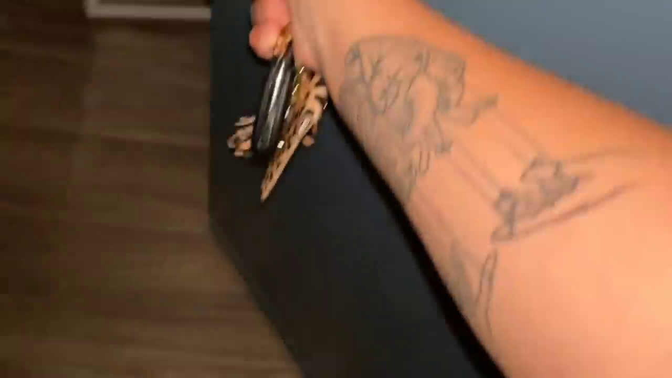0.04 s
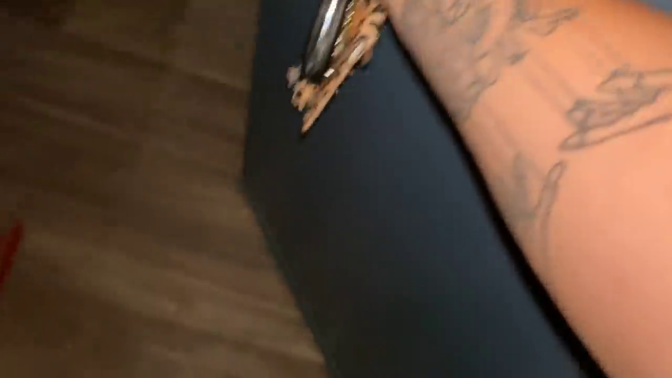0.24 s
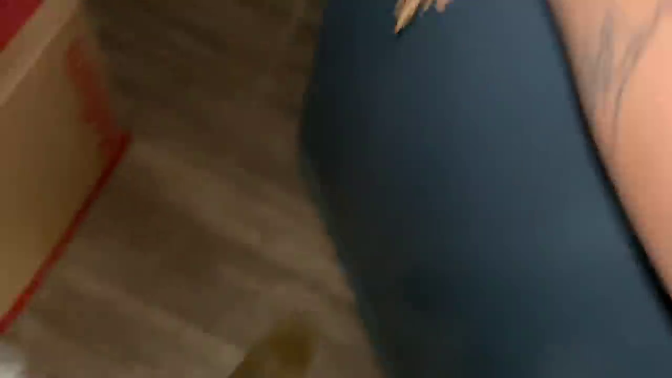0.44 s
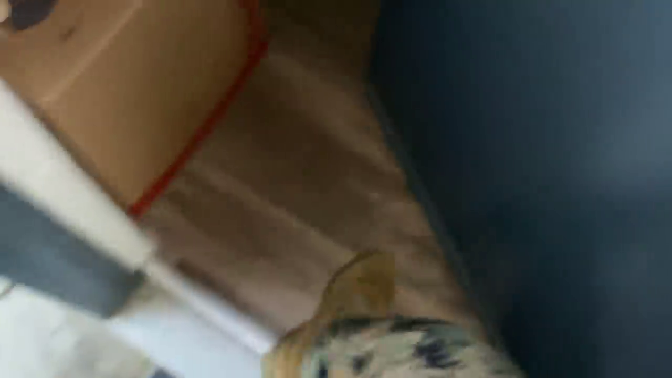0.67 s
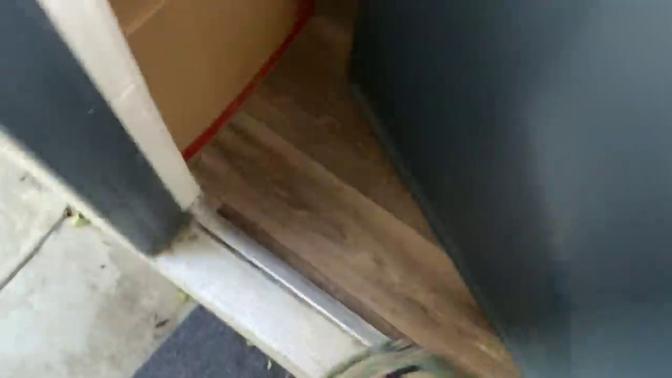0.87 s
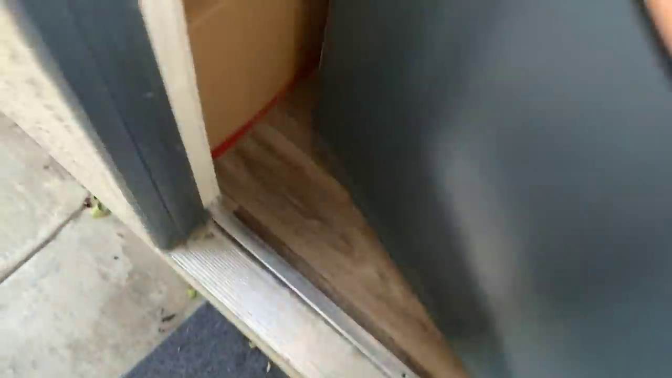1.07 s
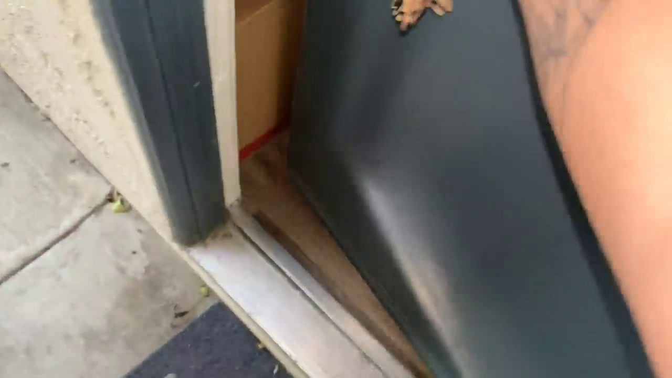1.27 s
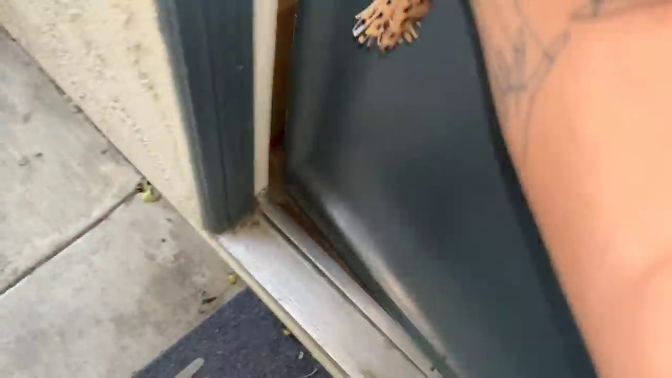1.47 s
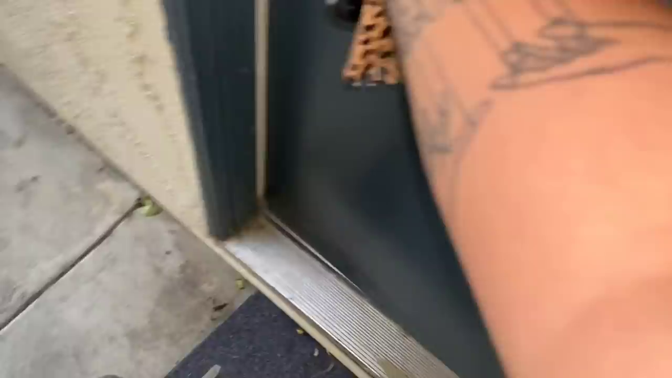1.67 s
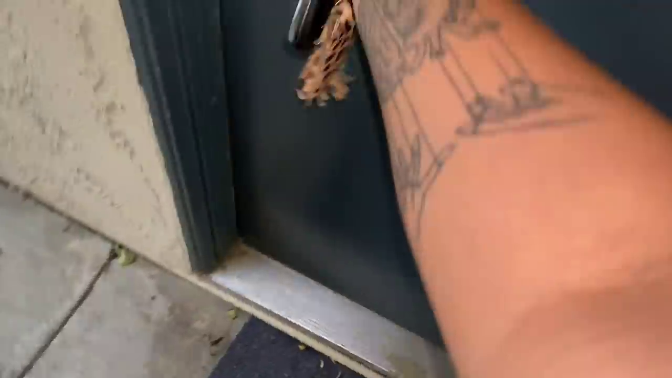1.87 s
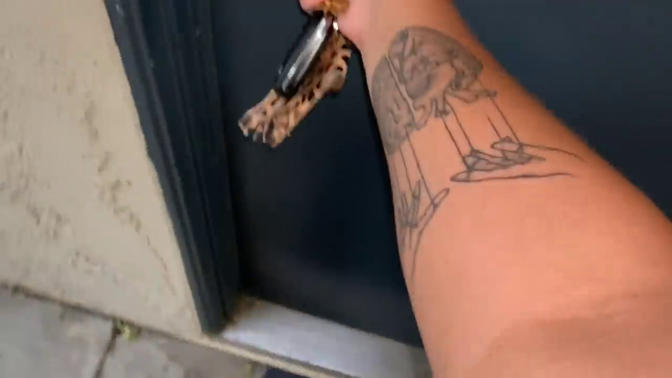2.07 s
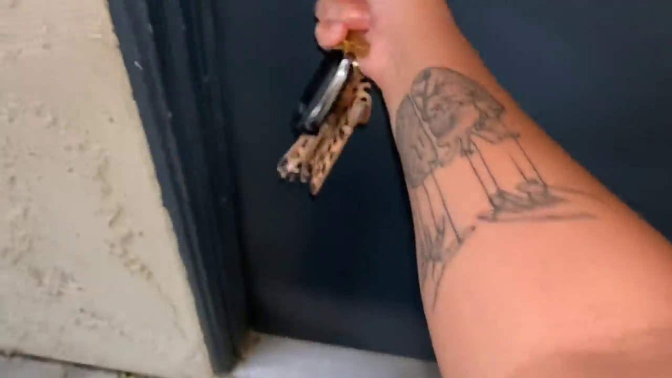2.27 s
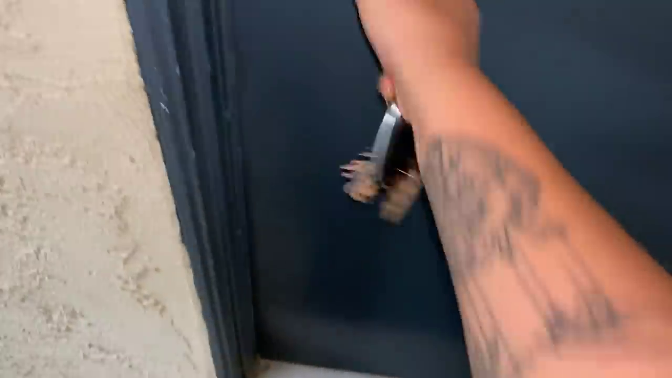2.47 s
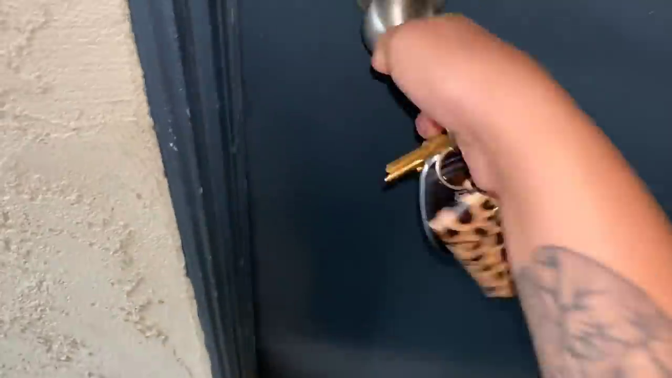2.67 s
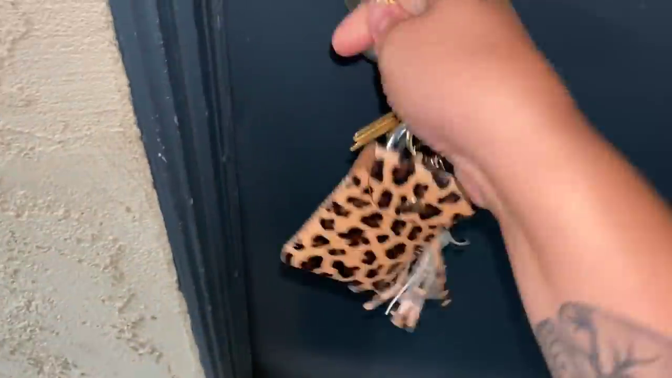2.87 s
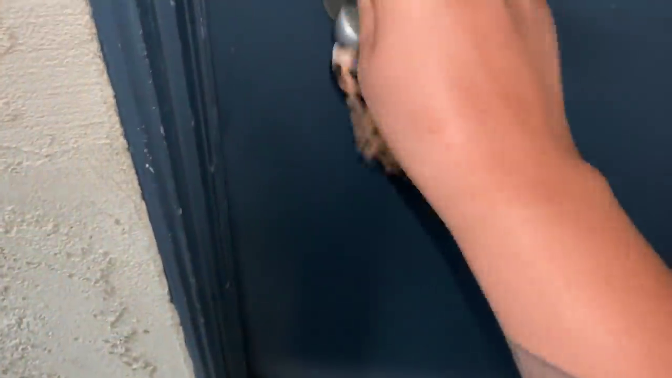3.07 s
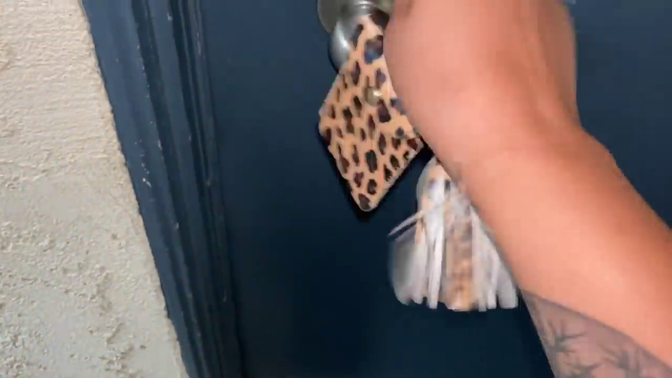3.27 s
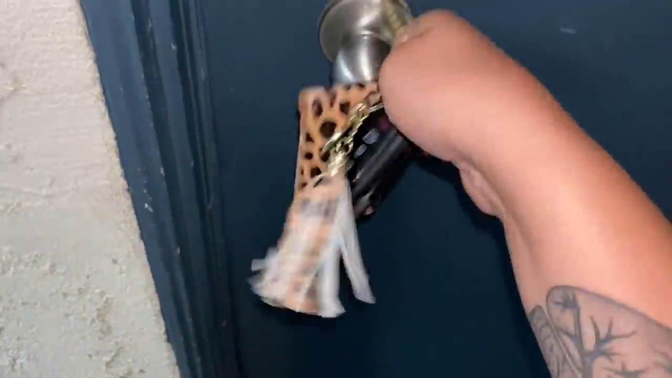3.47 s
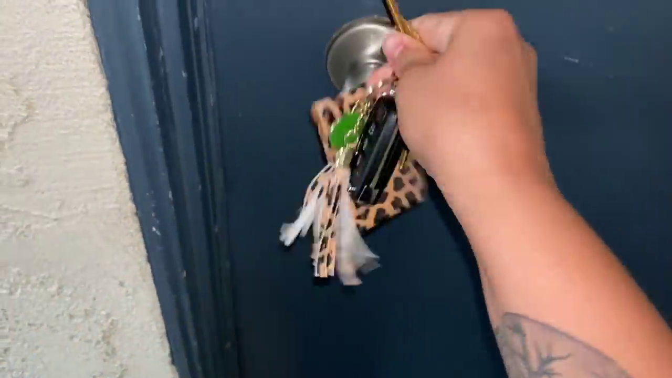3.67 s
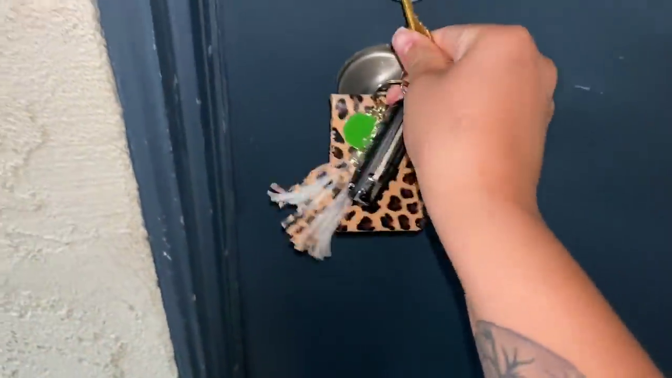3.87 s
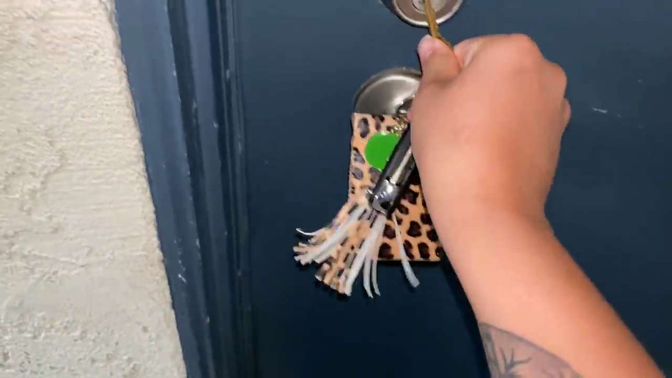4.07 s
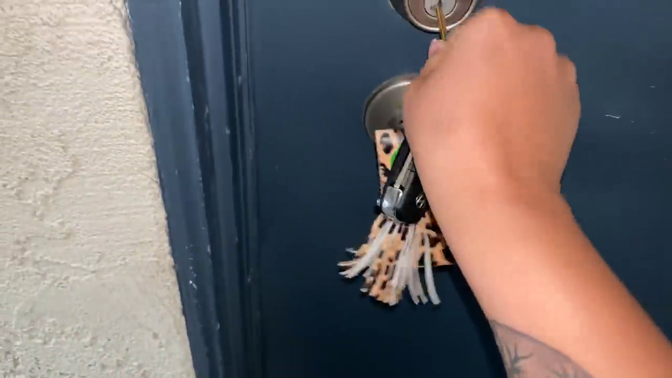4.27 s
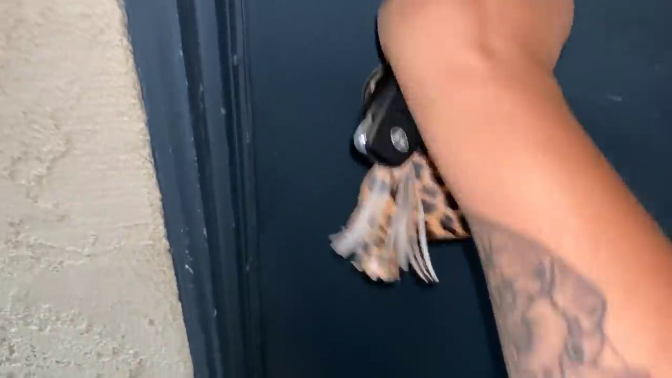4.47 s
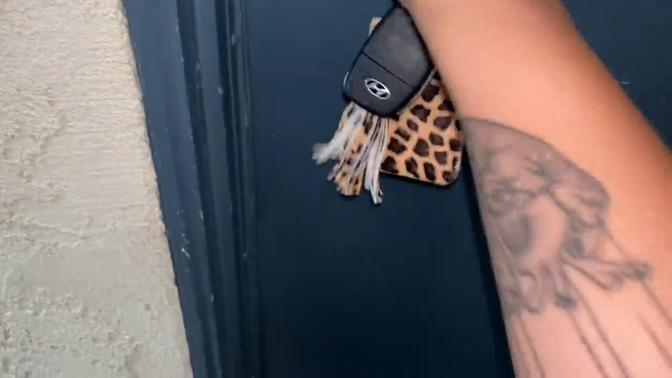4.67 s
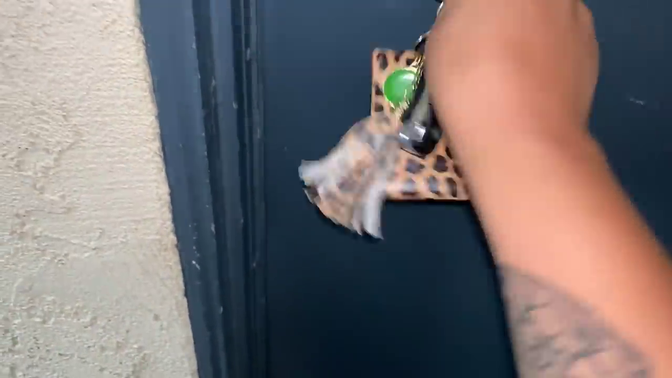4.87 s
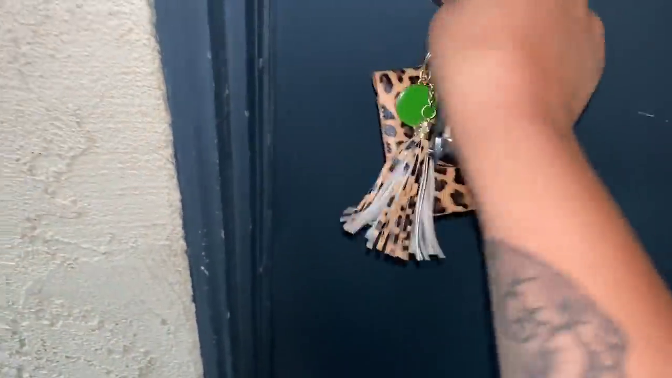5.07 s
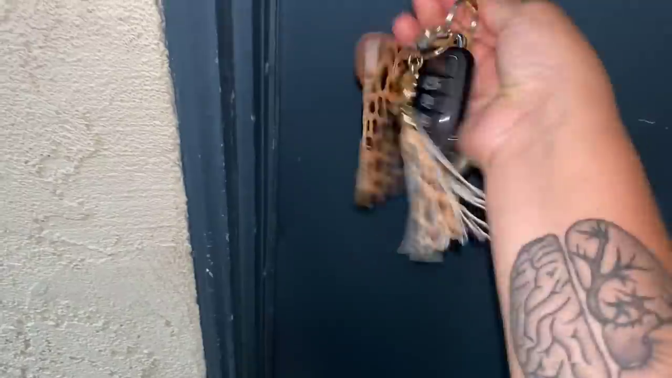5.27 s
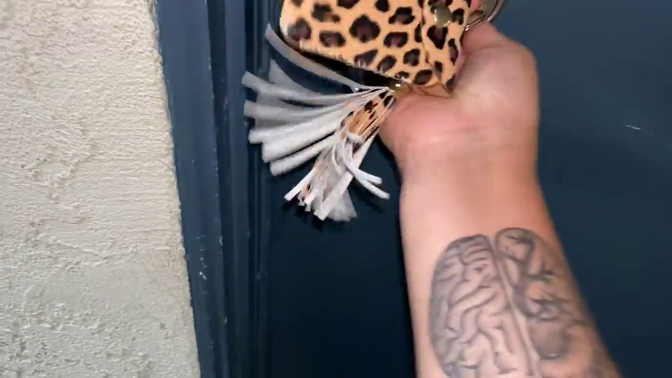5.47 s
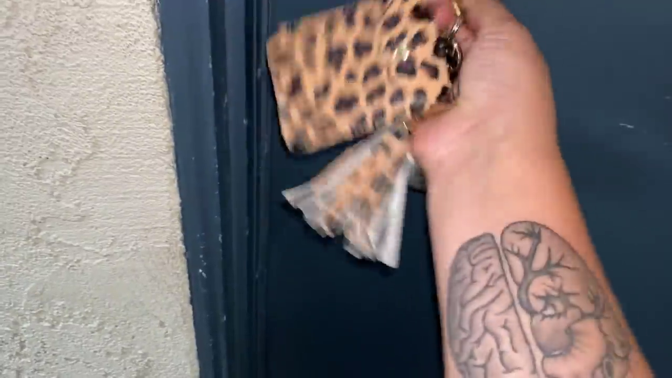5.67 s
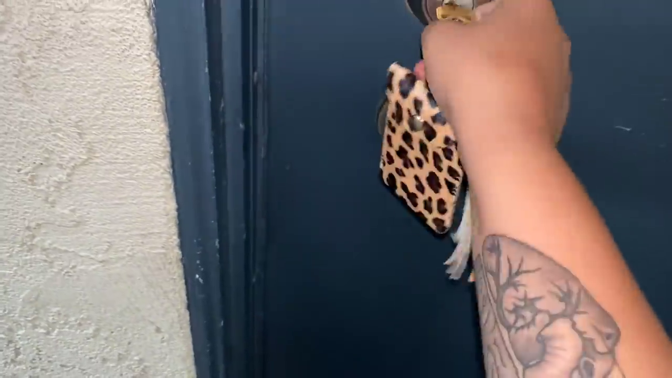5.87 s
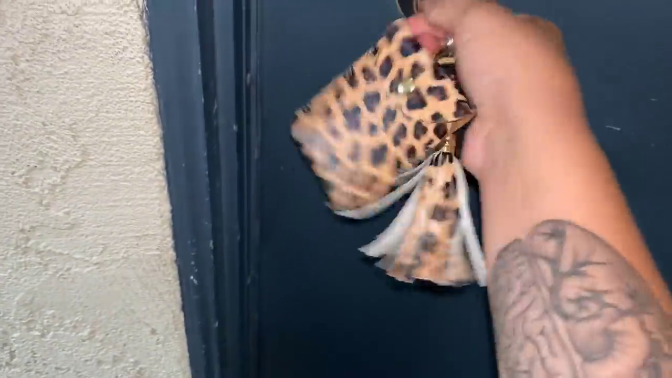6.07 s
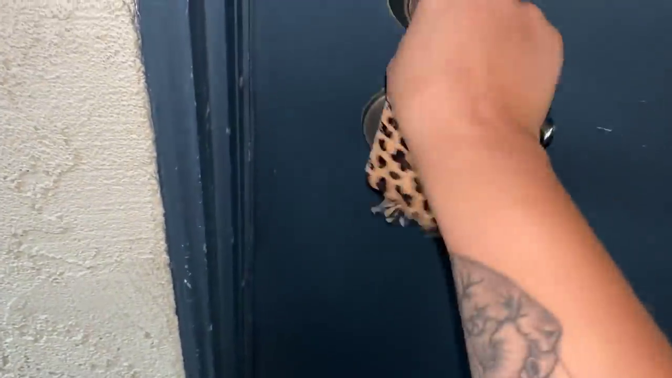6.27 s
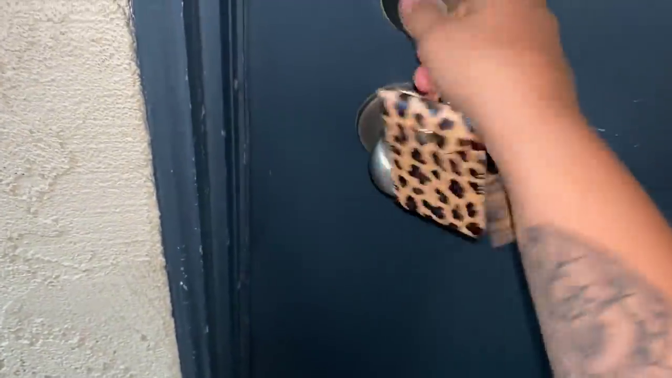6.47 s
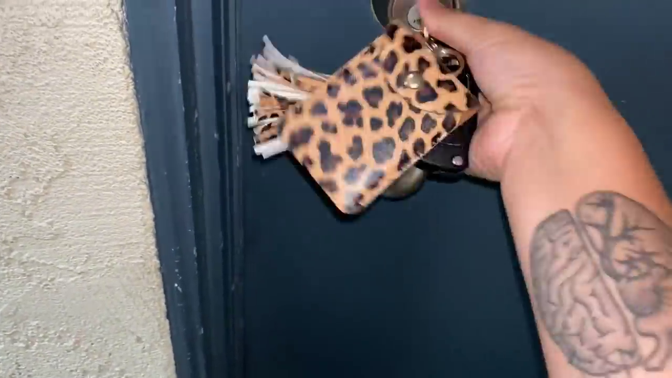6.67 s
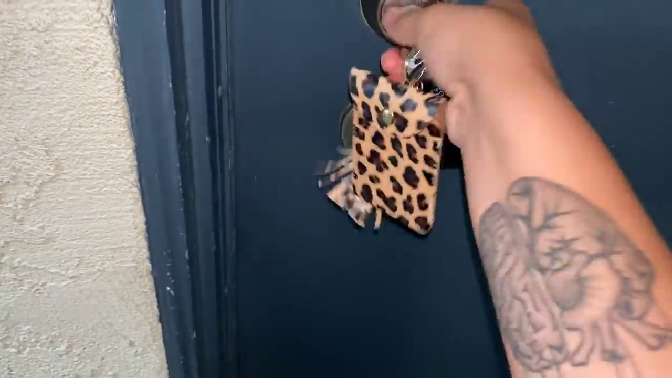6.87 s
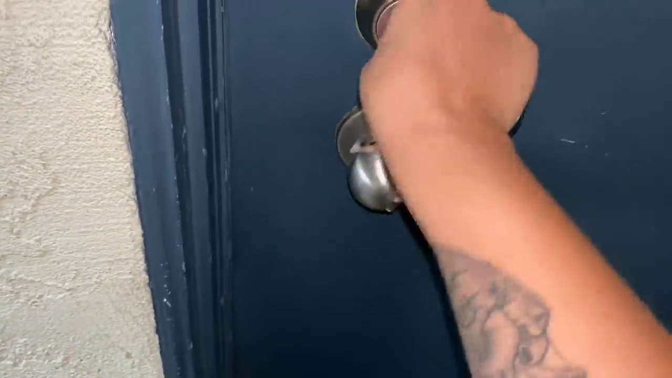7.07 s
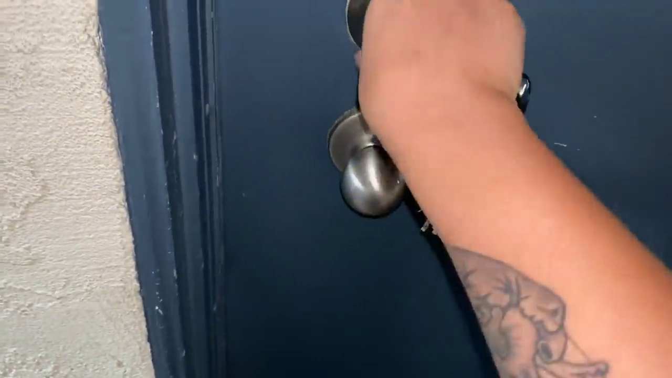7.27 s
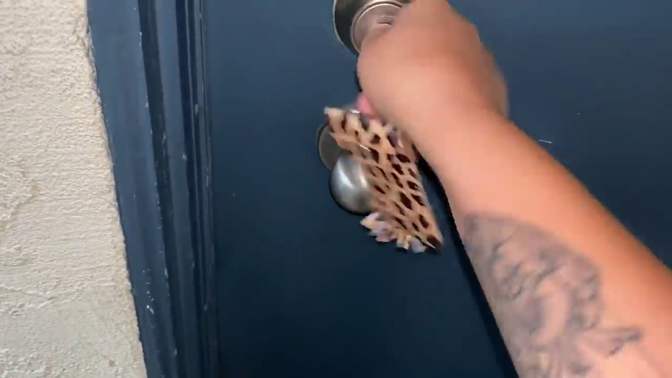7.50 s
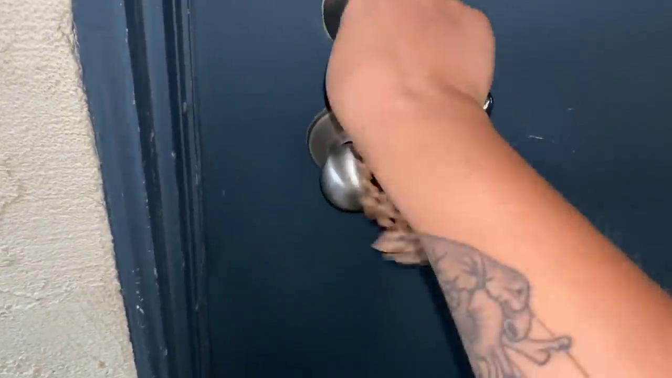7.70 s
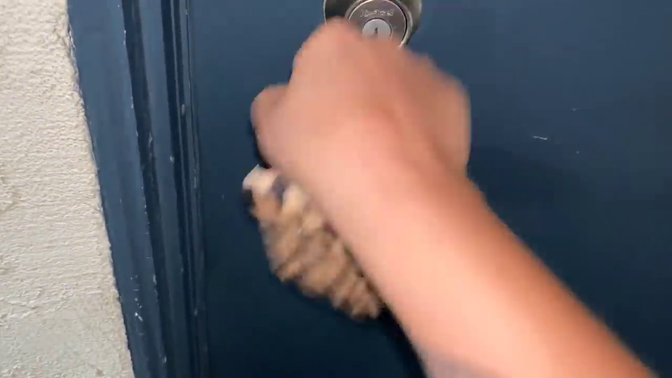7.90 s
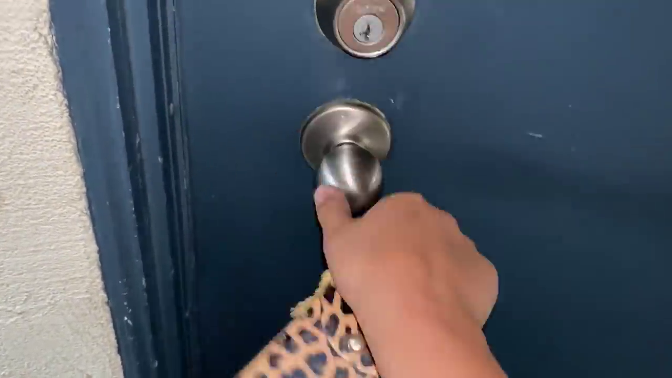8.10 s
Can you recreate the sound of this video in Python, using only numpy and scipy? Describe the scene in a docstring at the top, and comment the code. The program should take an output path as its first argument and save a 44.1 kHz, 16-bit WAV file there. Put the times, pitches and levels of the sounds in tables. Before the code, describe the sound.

In a small walled porch, a door swings with faint scuffs and small ticks, its seal chirps, and it shuts with a dull double thump and a hard latch clack. Keys then clink brightly, jingle in bursts and scrape at the lock, until a sharp bolt knock rings through the door leaf. Low distant traffic rumbles underneath. Close handheld stereo microphone.

```python
"""In a walled porch a front door is pulled shut, then a hand works a bunch of keys into the lock and turns the bolt.
Keys clink from short grazing clicks that excite damped ringing modes, and jingle when they hang free.
Latch, knob and bolt knock through the modes of the door leaf, soft pushes thump it, and the seal chirps downwards.
Shaped grains make rubbing, swish and key chatter; swelling filtered noise makes the far traffic rumble below.
A hand-held pair of microphone ports hears it all with a phase twist between the sides."""
import sys
import numpy as np
from scipy import signal
from scipy.fft import rfft, irfft, next_fast_len
from scipy.io import wavfile
from scipy.ndimage import uniform_filter1d

SR = 44100
rng = np.random.default_rng(int(sys.argv[2]) if len(sys.argv) > 2 else 0)


def file_out(sig):
    """Save sig as 16-bit WAV at sys.argv[1]."""
    # one column per channel
    cols = np.atleast_2d(sig).T
    # limit, then scale
    lim = np.clip(cols, -1, 1)
    pcm = np.round(lim * 32767).astype(np.int16)
    wavfile.write(sys.argv[1], SR, pcm)


N = 358974
SIZE = next_fast_len(N + SR)  # FFT length, padded by at least a second
HZ = np.maximum(np.fft.rfftfreq(SIZE, 1 / SR), 1)
GRAZE_S = .003  # light touching before a contact lands


def amp(db):
    """dB to gain."""
    return 10 ** (np.asarray(db) / 20)


def rms_one(x):
    """Scale to rms 1."""
    return x / np.sqrt(np.mean(x ** 2) + 1e-20)


def peak_one(x):
    """Scale to peak 1."""
    return x / np.abs(x).max()


def over_hz(table):
    """Columns of a frequency table on the FFT grid, interpolated over log frequency."""
    hz, *columns = np.transpose(table)
    return [np.interp(np.log(HZ), np.log(hz), column) for column in columns]


def in_time(table):
    """Columns of a time table at every sample."""
    s, *columns = np.transpose(table)
    return [np.interp(np.arange(N) / SR, s, column) for column in columns]


def coloured(x, spectrum):
    """Give white input the spectrum; rms 1."""
    gain = amp(over_hz(spectrum)[0])
    return rms_one(irfft(rfft(x, SIZE) * gain, SIZE)[:N])


def grains(per_s, spread_db):
    """Random clicks of uneven size and either sign; rms 1."""
    sizes = amp(spread_db * np.minimum(rng.exponential(1, N), 4)) * rng.choice([-1, 1], N)
    return rms_one(sizes * (rng.random(N) < per_s / SR))


def ring(x, hz, t60):
    """A two-pole resonator: a unit click sets a decaying sine of height 1 ringing."""
    r, w = amp(-60 / (t60 * SR)), 2 * np.pi * hz / SR
    return signal.lfilter([0, np.sin(w)], [1, -2 * r * np.cos(w), r * r], x + 1e-18)


def chatter(length):
    """A contact grazes for a moment, lands with one click and dies in a rattle of smaller ones."""
    t = np.arange(SR // 4) / SR - GRAZE_S
    shape = np.where(t < 0, np.exp(t / GRAZE_S * 2), np.exp(-t / max(length, .0005)))
    sparse = rng.standard_normal(len(t)) ** 3 * (rng.random(len(t)) < .3)
    clicks = sparse * shape * 0.11 * min(1, length / 0.0044)
    clicks[round(GRAZE_S * SR)] = min(1, 0.003 / length)  # a long rattle has no dominant click
    return clicks


def struck(clicks, modes):
    """Every blow lands on another spot and so weighs the modes anew."""
    chance_db = rng.normal(0, 3.5, len(modes))
    return sum(amp(db + more_db) * ring(clicks, hz, t60)
               for (hz, db, t60), more_db in zip(modes, chance_db))


def crack(clicks, low_hz, high_hz):
    """The broad dry edge of a contact: its clicks through a band-pass; peak 1."""
    band = signal.butter(2, [low_hz, min(high_hz, .45 * SR)], "band", fs=SR, output="sos")
    return peak_one(signal.sosfilt(band, clicks))


def add(out, s, sound):
    """Mix a contact in so that its graze ends at the given time."""
    at = round((s - GRAZE_S) * SR)
    out[at:][:len(sound)] += sound[:N - at]


# Colour of the far traffic. Each row: frequency in Hz, relative level in dB.
TRAFFIC_COLOUR = [(25, -39), (53, 9), (80, 5), (157, -4), (326, -18), (900, -25.5), (2000, -45.5),
                  (4500, -35.5), (9000, -108), (16000, -43)]
# Traffic swelling and fading. Each row: time in seconds, level in dB.
TRAFFIC_SWELL = [(0, -54), (1.5, -49), (2.1, -43.5), (2.7, -50.5), (4.3, -48.5), (4.7, -48.5), (5.6, -50.5),
                 (8.14, -50.5)]


def traffic():
    """Far traffic: coloured noise that swells slowly, in two independent fields."""
    rumble = np.array([coloured(rng.standard_normal(N), TRAFFIC_COLOUR) for field in range(2)])
    return amp(in_time(TRAFFIC_SWELL)[0]) * rumble


# Colour of the rubbing. Each row: frequency in Hz, relative level in dB.
RUB_COLOUR = [(70, 18.5), (300, 5.5), (600, 5), (1300, 0.5), (2500, -7.5), (5000, -7.5), (10000, -69)]
# How strongly hand, seal and shoes rub. Each row: time in seconds, level in dB.
RUBBING = [(0, -52.5), (.3, -65), (.55, -56), (.8, -63), (1.2, -61), (1.58, -64.5), (1.85, -48.5),
           (2.2, -62), (2.55, -51), (2.85, -65.5), (3.3, -59), (3.65, -116), (4.02, -66.5), (4.38, -58),
           (4.58, -38.5), (4.7, -54), (5.95, -62), (6.1, -54), (6.58, -60), (6.85, -52), (7.7, -52.5),
           (7.85, -55.5), (8.14, -65)]


def rubbing():
    """Hand, seal and shoes rub: dense small clicks, coloured, make a grainy noise."""
    return amp(in_time(RUBBING)[0]) * coloured(grains(per_s=1200.0, spread_db=1.5), RUB_COLOUR)


# The arm or the bunch swings. Each row: start in seconds, hold in seconds,
# level of cloth and tassel swish in dB, level of small key chatter in dB.
SWINGS = [(0, 0.0052, -63, -65), (0.423, 0.28, -63.5, -65.5), (0.98, 0.15, -61, -93),
          (1.647, 0.027, -63.5, -79), (2.392, 0.36, -67.5, -60.5), (2.763, 0.11, -89, -82),
          (3.106, 0.13, -64, -50), (3.503, 0.062, -85, -55.5), (4.634, 0.097, -59, -49.5),
          (4.875, 0.36, -56.5, -56), (5.463, 0.23, -97, -67.5), (5.91, 0.03, -90, -74),
          (6.14, 0.011, -72, -56), (6.516, 0.017, -62.5, -58), (6.86, 0.043, -93, -64),
          (7.637, 0.012, -87, -60.5), (8.006, 0.18, -66, -56)]
SWING_RISE_DB_PER_S, SWING_FALL_DB_PER_S = 99, 59


def swings():
    """Each swing swells, holds and fades; returns swish and chatter levels in dB, swings added as power."""
    start, hold, *levels = np.transpose(SWINGS)[:, :, None]
    t = np.arange(0, N / SR + .01, .005)
    rise_db = -SWING_RISE_DB_PER_S * np.maximum(start - t, 0)
    fall_db = -SWING_FALL_DB_PER_S * np.maximum(t - start - hold, 0)
    powers = [np.sum(amp(db + rise_db + fall_db) ** 2, axis=0) for db in levels]
    return in_time(np.transpose([t] + [10 * np.log10(power) for power in powers]))


# Colour of cloth and tassel. Each row: frequency in Hz, relative level in dB.
SWISH_COLOUR = [(800, -8), (2000, -2.5), (5000, -3.5), (8000, -8), (12000, -12), (16000, -66)]


def swish(level_db):
    """Cloth and tassel brush past: very dense, fairly even grains make a smooth hiss."""
    return amp(level_db) * coloured(grains(per_s=3200.0, spread_db=0.5), SWISH_COLOUR)


def key_chatter(level_db):
    """Small uneven touches in the bunch, in clumps; each is a tick of a few cycles at one or two pitches."""
    drift = rms_one(uniform_filter1d(rng.standard_normal(N), size=500))
    touches = amp(5 * np.minimum(drift, 2)) * grains(per_s=1500.0, spread_db=3.5)
    pitches = np.geomspace(3200, 15000, 10)
    dealt = rng.integers(0, len(pitches), (2, N))  # two pitch draws per touch
    ticks = np.zeros(N)
    for k, hz in enumerate(pitches):
        chosen = touches * (dealt == k).any(axis=0)
        ticks += ring(chosen, hz, 18.0 / hz) * (hz / 6000) ** 0.3
    return amp(level_db) * rms_one(ticks)


# Modes of the door leaf. Each row: frequency in Hz, level in dB, 60 dB decay in seconds.
DOOR_MODES = [(59.2, -10.5, 0.9), (75.7, -3.5, 0.2), (116.7, -12, 1), (159, 2, 0.19), (197, -11, 0.11),
              (300, -25.5, 0.25), (417, -38, 0.25), (510, -0.5, 0.065), (720, -1.5, 0.073),
              (786, -24, 0.076), (1110, -42, 0.11), (1290, 15.5, 0.013), (1600, 1, 0.011)]
# Latch, knob, bolt and shoes. Each row: time in seconds, level in dB, colour in Hz, chatter length in seconds.
KNOCKS = [(0.101, -48.5, 725, 0.0032), (0.24, -50.5, 610, 0.0044), (0.413, -45, 235, 0.0026),
          (0.512, -46, 378, 0.0089), (0.91, -41, 2720, 0.01), (0.947, -42, 2860, 0.0052),
          (1.022, -45, 3020, 0.01), (1.055, -41.5, 169, 0.0064), (1.117, -43, 3000, 0.0058),
          (1.131, -45, 408, 0.0035), (1.345, -47, 3250, 0.001), (1.65, -31, 580, 0.026),
          (1.683, -31, 300, 0.0092), (1.688, -49, 2170, 0.0059), (1.823, -38, 1050, 0.037),
          (1.943, -21.5, 980, 0.0019), (2.353, -45.5, 1250, 0.013), (2.406, -32, 855, 0.0062),
          (2.4186, -28.5, 504, 0.0059), (2.424, -28.5, 1420, 0.0033), (3.154, -51, 430, 0.0072),
          (3.174, -41.5, 1260, 0.0028), (3.767, -47.5, 1600, 0.0058), (4.072, -31, 2370, 0.0068),
          (4.179, -42.5, 1550, 0.01), (4.78, -36, 1400, 0.0032), (4.841, -41, 1430, 0.029),
          (4.901, -37.5, 2080, 0.02), (5.593, -44, 1480, 0.018), (5.727, -43.5, 895, 0.0069),
          (5.858, -38, 2880, 0.014), (6.027, -39, 2800, 0.0041), (6.084, -39, 2620, 0.042),
          (6.239, -44, 2150, 0.01), (6.266, -26, 2110, 0.00073), (6.276, -38.5, 543, 0.0096),
          (6.609, -34, 1570, 0.001), (6.678, -41.5, 1290, 0.039), (6.739, -33.5, 2140, 0.0036),
          (6.794, -38, 1550, 0.0052), (6.829, -32, 990, 0.012), (6.909, -41, 1370, 0.0057),
          (7.0171, -21, 1470, 0.0088), (7.019, -36.5, 510, 0.01), (7.247, -40, 1950, 0.0021),
          (7.337, -39, 1800, 0.042), (7.456, -41.5, 1070, 0.0061), (7.502, -42.5, 1280, 0.0019),
          (7.572, -37.5, 1530, 0.022), (7.627, -40.5, 1110, 0.014), (7.782, -38, 710, 0.0082),
          (7.787, -31.5, 1035, 0.03)]
KNOCK_CYCLES = 5  # cycles of the colour until it is 60 dB down
LEAF_DB, PANEL_DB, PANEL_T60_S = -5, -3.5, 0.042


def knocks():
    """Colour, crack, leaf modes and dense nearby modes as dying noise; small parts skip the four lowest modes."""
    out, t = np.zeros(N), np.arange(SR // 8) / SR
    for s, level_db, hz, length in KNOCKS:
        clicks = chatter(length)
        colour = amp(4.0) * peak_one(ring(clicks, hz, KNOCK_CYCLES / hz))
        edge_db = 6 + 0.34 * (level_db + 23.5)  # harder blows crack more
        edge = amp(edge_db) * crack(clicks, 0.68 * hz, 3430)
        leaf = amp(LEAF_DB) * peak_one(struck(clicks, DOOR_MODES[4:]))
        dying_noise = rng.standard_normal(len(t)) * amp(-60 * t / PANEL_T60_S)
        dense = signal.fftconvolve(clicks, dying_noise)[:len(clicks)]
        panel = amp(PANEL_DB) * crack(dense, 0.47 * hz, 1.97 * hz)
        add(out, s, amp(level_db) * (colour + edge + leaf + panel))
    return out


# Rubber seal peeling with a falling chirp. Each row: time in seconds, level in dB, from Hz, towards Hz.
SQUEAKS = [(1.133, -42, 1505, 187), (1.225, -40.5, 1600, 410)]


def squeaks():
    """The peeling seal gives a tone of rough loudness that glides down mostly within 20 ms."""
    out, t = np.zeros(N), np.arange(SR // 20) / SR
    swell = peak_one(t * np.exp(-t / 0.0067))
    for s, level_db, from_hz, to_hz in SQUEAKS:
        hz = to_hz + (from_hz - to_hz) * np.exp(-t / 0.0064)
        rough_db = 3.5 * rms_one(uniform_filter1d(rng.standard_normal(len(t)), size=60))
        tone = np.sin(2 * np.pi * np.cumsum(hz) / SR)
        add(out, s, amp(level_db + rough_db) * tone * swell)
    return out


# Door leaf meeting frame and seal, or leant on. Each row: start in seconds, level in dB, push length in seconds.
THUMPS = [(1.652, -23.5, 0.01), (1.676, -25, 0.0084), (1.944, -26.5, 0.01), (2.002, -22, 0.027),
          (4.609, -21.5, 0.02), (7.79, -32.5, 0.0082)]


def thumps():
    """A soft push, one smooth raised-cosine hump, drives all modes of the door leaf."""
    push = np.zeros(N)
    for s, level_db, length in THUMPS:
        shape = np.hanning(max(round(length * SR), 8))
        push[round(s * SR):][:len(shape)] += amp(level_db) * shape / shape.sum()
    return sum(amp(level_db) * ring(push, hz, t60) for hz, level_db, t60 in DOOR_MODES)


# Bending modes of freely hanging keys. Each row: frequency in Hz, level in dB, 60 dB decay in seconds.
KEY_MODES = [(4850, -6, .025), (5740, -11, .04), (6880, -9, .05), (7106, -7, .09), (7195, -8, .09),
             (9460, -14, .06), (10700, -3, .06), (11260, -4, .1), (12670, -5, .06), (14220, -12, .05)]
# Keys touching each other or the lock face. Each row: time in seconds, level in dB, colour in Hz.
CLINKS = [(1.653, -29, 3870), (1.845, -37.5, 3600), (2.243, -50.5, 3300), (2.2975, -34.5, 3440),
          (2.382, -44, 5700), (2.405, -40, 3040), (2.4195, -17.5, 2980), (2.574, -47, 6030),
          (2.6202, -37, 3930), (2.6422, -44, 6400), (2.6886, -37.5, 6400), (2.854, -38.5, 5730),
          (2.91, -39, 5270), (2.942, -37.5, 8000), (2.999, -37, 7650), (3.033, -42, 6640),
          (3.127, -41, 7000), (3.1516, -32, 4130), (3.1754, -30, 6570), (3.249, -28, 6700),
          (3.2574, -23, 3300), (3.305, -36, 3820), (3.3726, -29.5, 6900), (3.377, -35, 7200),
          (3.4049, -38.5, 6500), (3.4245, -34.5, 8900), (3.46, -37, 6400), (3.478, -38.5, 5900),
          (3.5066, -44, 7900), (3.5333, -26.5, 6100), (3.55, -25.5, 5600), (3.571, -33.5, 7400),
          (3.602, -40, 5880), (3.6394, -43, 8040), (3.651, -36.5, 9100), (3.7165, -43, 3900),
          (3.7686, -31.5, 3400), (3.978, -50, 5000), (4.046, -49, 6400), (4.057, -36.5, 3020),
          (4.074, -31, 6170), (4.1792, -37.5, 3540), (4.2653, -50, 8700), (4.592, -33.5, 6160),
          (4.6496, -53, 6000), (4.6855, -30.5, 5940), (4.712, -42, 7760), (4.7295, -30, 9300),
          (4.765, -28.5, 5440), (4.775, -24.5, 5400), (4.8402, -19, 8000), (4.8554, -23, 7400),
          (4.8652, -27.5, 7060), (4.903, -31, 5950), (4.91, -24.5, 8150), (5.0455, -36.5, 5530),
          (5.0821, -44, 7000), (5.1106, -57, 8000), (5.1408, -28.5, 5850), (5.1644, -20.5, 12700),
          (5.1918, -32, 3020), (5.228, -30, 6000), (5.235, -46, 6500), (5.244, -42, 7540),
          (5.259, -38, 6000), (5.28, -27, 4350), (5.3019, -28, 5650), (5.3167, -29.5, 6400),
          (5.4149, -28.5, 8300), (5.4996, -42, 7150), (5.597, -41, 3500), (5.7302, -47.5, 6600),
          (5.859, -37, 6800), (5.8877, -37.5, 3280), (5.9352, -49, 6530), (5.9806, -49, 7500),
          (6.013, -40, 3430), (6.1245, -33.5, 6600), (6.1508, -37, 6460), (6.168, -39, 6000),
          (6.278, -41, 7100), (6.296, -33, 3070), (6.311, -49, 3200), (6.4025, -36, 3550),
          (6.455, -29, 5000), (6.4652, -21.5, 3020), (6.483, -27, 2840), (6.5068, -38, 6600),
          (6.607, -53, 2870), (6.676, -36.5, 3130), (6.77, -34.5, 6700), (6.9683, -43.5, 3870),
          (6.9918, -55, 7000), (7.017, -23.5, 3990), (7.026, -24.5, 7000), (7.481, -48, 7000),
          (7.496, -33, 3700), (7.5637, -40, 3400), (7.5719, -25.5, 3760), (7.631, -31, 3470),
          (7.79, -27.5, 3070), (7.81, -39, 9100), (7.827, -36, 6000), (7.841, -31, 3100),
          (7.8784, -27.5, 3850), (8.023, -33.5, 6150), (8.0926, -24.5, 7300)]
CLINK_CHATTER_S, CLINK_CYCLES = 0.0026, 16.2  # cycles of the colour until it is 60 dB down


def clinks():
    """A short colour of its own, a crack brighter for high contacts, and key modes damped by the grip."""
    out = np.zeros(N)
    gripped = [(hz, db, 0.011 * t60) for hz, db, t60 in KEY_MODES]
    for s, level_db, hz in CLINKS:
        clicks = chatter(CLINK_CHATTER_S)
        colour = peak_one(ring(clicks, hz, CLINK_CYCLES / hz))
        keys_db = 3.5 - 14 * (hz < 4000)  # low clinks are the lock face, not the keys
        keys = amp(keys_db) * peak_one(struck(clicks, gripped))
        edge = amp(1.5) * crack(clicks, 0.31 * hz, 2.09 * hz)
        add(out, s, amp(level_db) * (colour + keys + edge))
    return out


# Keys hanging free and struck so that they ring on. Each row: start in seconds, level in dB,
# rattle swell time in seconds.
JINGLES = [(3.029, -38, 0.004), (3.054, -31.5, 0.0054), (3.237, -37, 0.011), (4.715, -42, 0.0034),
           (4.824, -39, 0.0043), (4.835, -24.5, 0.004), (4.857, -23.5, 0.0048), (4.898, -37.5, 0.0069),
           (4.984, -32.5, 0.0049), (5.161, -36.5, 0.0057), (7.971, -35.5, 0.0076)]


def jingles():
    """Free keys rattle together in a burst that swells and dies, and ring on with their bending modes."""
    out, t = np.zeros(N), np.maximum(np.arange(SR // 4) / SR - GRAZE_S, 0)
    for s, level_db, swell in JINGLES:
        clicks = rng.standard_normal(len(t)) ** 3 * (t * np.exp(-t / swell)) ** 0.59
        ringing = peak_one(struck(clicks, KEY_MODES))
        add(out, s, amp(level_db) * (ringing + amp(5.5) * crack(clicks, 2000, 12500)))
    return out


PORCH_T60_S, PORCH_DB = 0.58, -11  # decay of the lows, echo level
PORCH_DULL_HZ, PORCH_MID_T60_S = 1800, 0.36  # above this, an extra decay on top
PORCH_TOP_HZ, PORCH_TOP_T60_S = 6500, .1  # above this, a faster extra decay instead


def porch(near, sent):
    """Direct sound plus wall echoes, treble dying sooner; short allpass paths scatter the second field's phase."""
    t = np.arange(SR) / SR
    white = rng.standard_normal((2, SR))
    low = signal.lfilter(*signal.butter(1, PORCH_DULL_HZ, fs=SR), white)
    below_top = signal.lfilter(*signal.butter(2, PORCH_TOP_HZ, fs=SR), white)
    middle = (below_top - low) * amp(-60 * t / PORCH_MID_T60_S)
    top = (white - below_top) * amp(-60 * t / PORCH_TOP_T60_S)
    tails = (low + middle + top) * amp(-60 * t / PORCH_T60_S) * (t > .007)  # echoes start after 7 ms
    tails *= amp(PORCH_DB) / np.sqrt(np.sum(tails ** 2, axis=1, keepdims=True))
    fields = near + signal.fftconvolve(sent[None], tails, axes=1)[:, :N]
    for lag in (23, 71, 149):  # samples
        path = np.r_[1, np.zeros(lag - 1), -.4]
        fields[1] = signal.lfilter(path[::-1], path, fields[1])
    return fields


# The port pair. Each row: frequency in Hz, phase lead of the left in radians,
# likeness of the sides from 0 to 1, left over right in dB.
PORTS = [(60, 0, .999, .4), (170, -.15, .97, 1.5), (400, -.4, .75, 2.5), (700, -.7, .4, -.5),
         (1150, -3.1, .15, -.5), (1600, -6.0, .6, 1.5), (2000, -5.6, .7, .3), (3000, -4.3, .65, -.4),
         (3800, -4.2, .5, -.4), (4600, -3.2, .8, -1.2), (5350, -2.6, .7, .3), (5900, .7, .85, 0),
         (8000, 1.5, .88, 0), (12500, 2.8, .9, 0), (17000, 3.14, .95, 0)]


def two_sides(fields):
    """The sides share one field and differ by a second one, mixed by their likeness at each frequency."""
    shared, other = rfft(fields, SIZE)
    alike = over_hz(PORTS)[1]
    shared, other = shared * np.sqrt((1 + alike) / 2), other * np.sqrt((1 - alike) / 2)
    return irfft([shared + other, shared - other], SIZE)[:, :N]


KEYS_DRIER_DB = 7  # keys send this much less into the echoes


def scene():
    """Near sounds through the porch, plus traffic, spread over two sides."""
    swish_db, chatter_db = swings()
    keys = clinks() + jingles() + key_chatter(chatter_db)
    door = knocks() + thumps() + squeaks()
    rub = rubbing()
    brush = swish(swish_db)
    far = traffic()
    near = keys + door + rub + brush
    sent = amp(-KEYS_DRIER_DB) * keys + door + rub + brush
    return two_sides(porch(near, sent) + far)


CUTOFF_HZ = 16650  # from here up the top is at least 70 dB down


def record(dry):
    """The ports twist the phase and tilt the balance by frequency; the deepest bass and the top are cut."""
    lead, alike, balance_db = over_hz(PORTS)
    half = np.exp(.5j * lead) * amp(balance_db / 2)  # each side takes half the difference
    wet = irfft(rfft(dry, SIZE) * [half, 1 / half], SIZE)[:, :N]
    wet = signal.sosfilt(signal.butter(4, 42, "high", fs=SR, output="sos"), wet)
    return signal.sosfilt(signal.cheby2(14, 70, CUTOFF_HZ, fs=SR, output="sos"), wet)


dry = scene()
out = record(dry)
file_out(out)
```